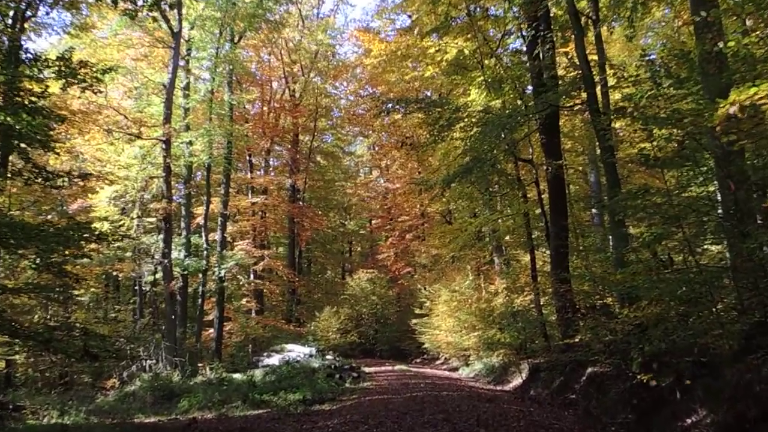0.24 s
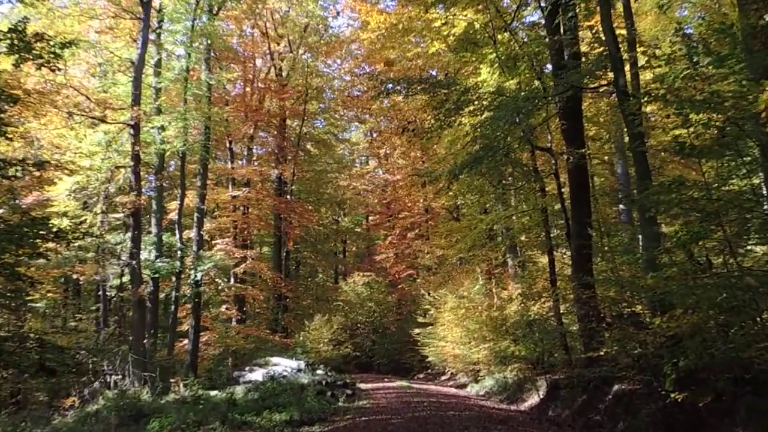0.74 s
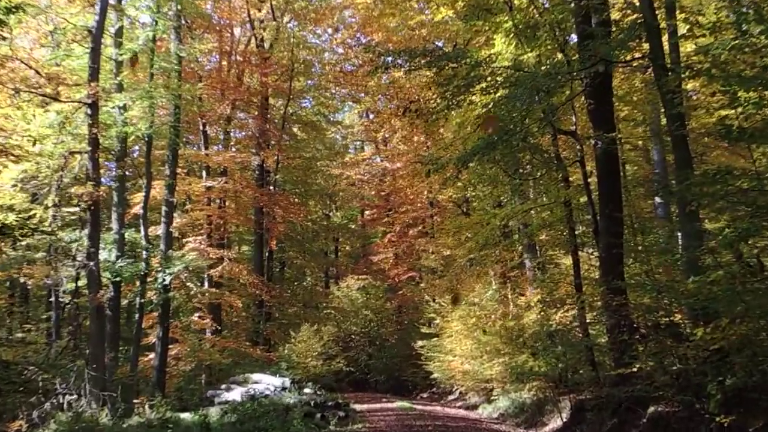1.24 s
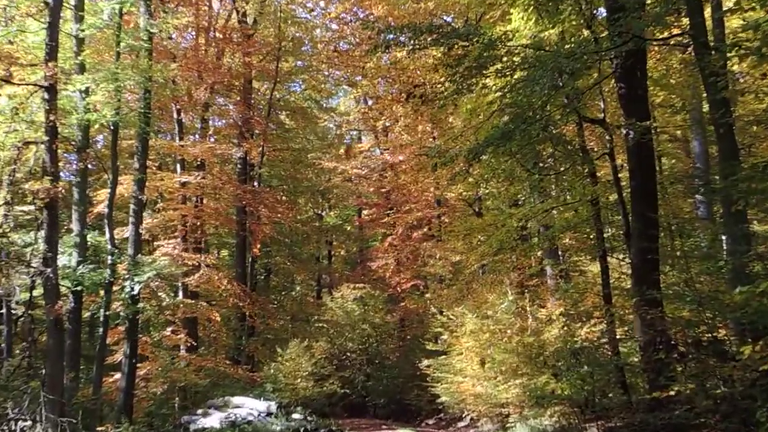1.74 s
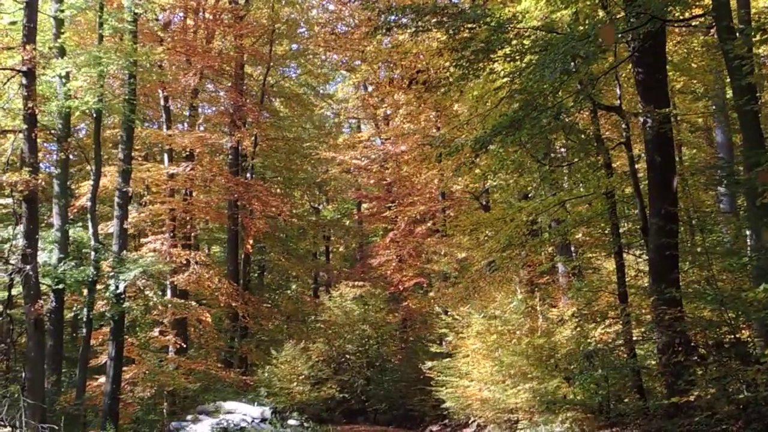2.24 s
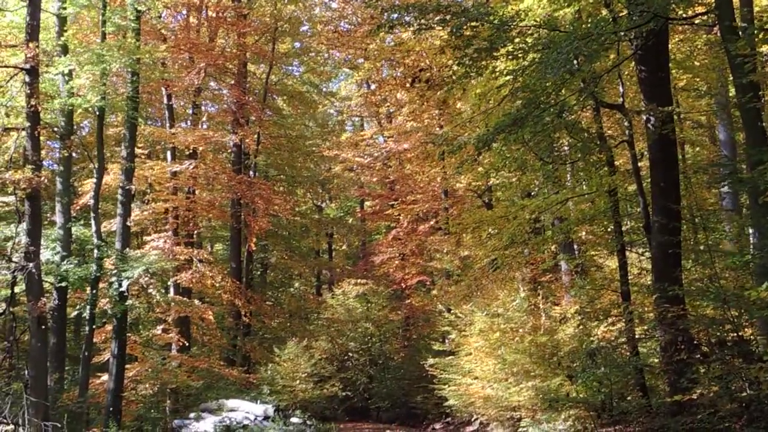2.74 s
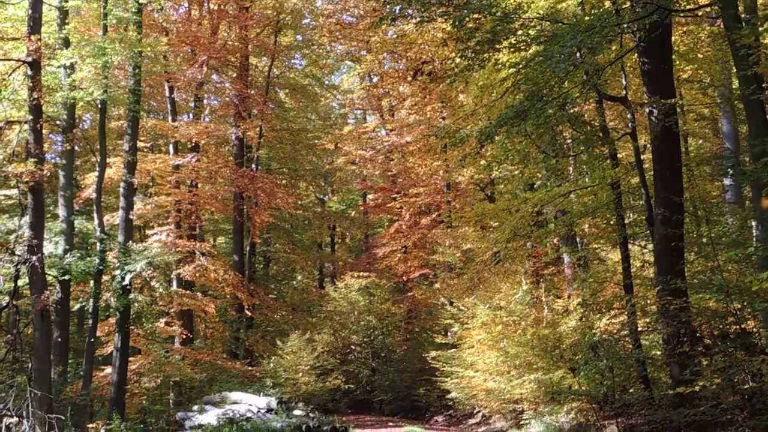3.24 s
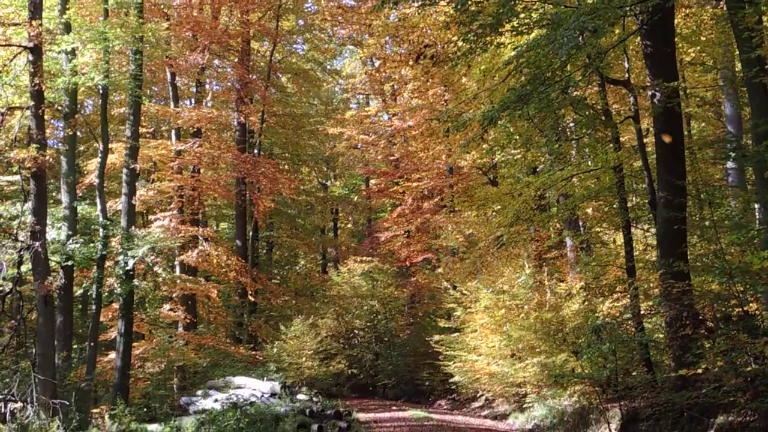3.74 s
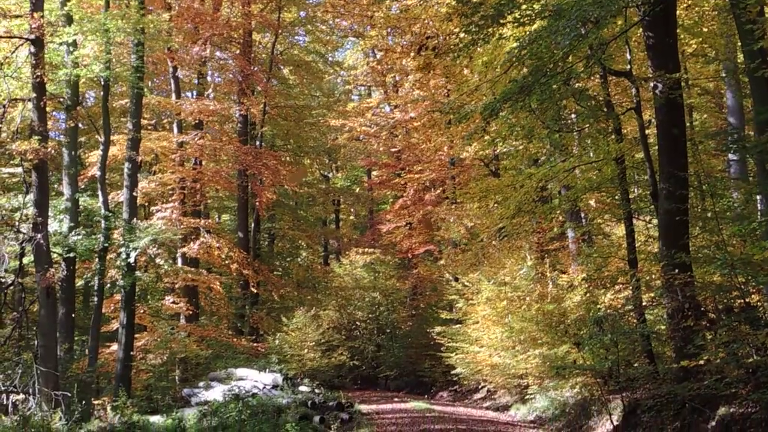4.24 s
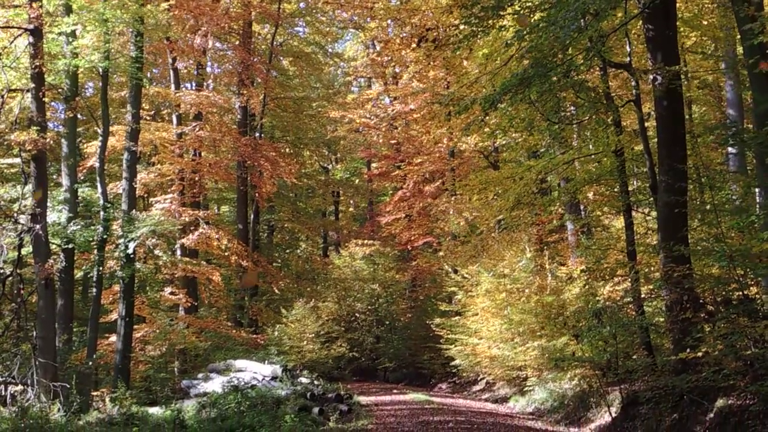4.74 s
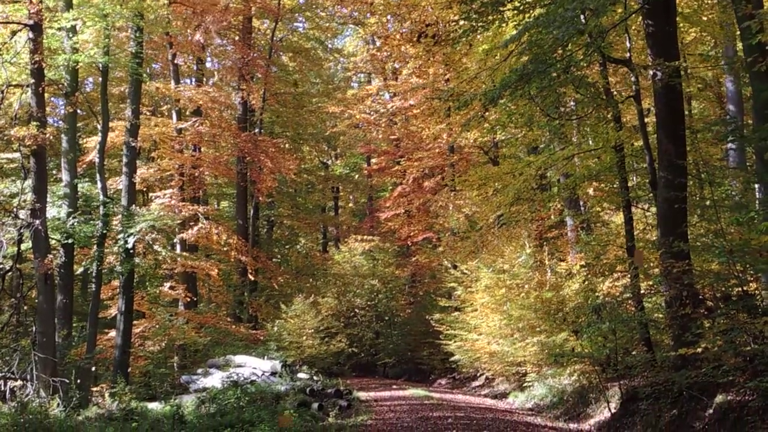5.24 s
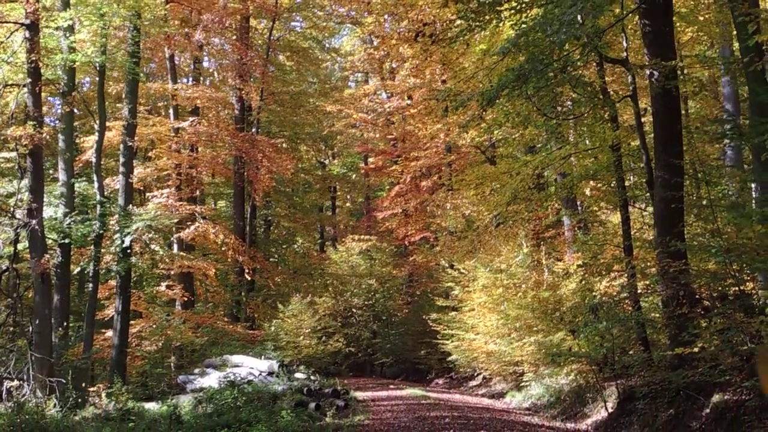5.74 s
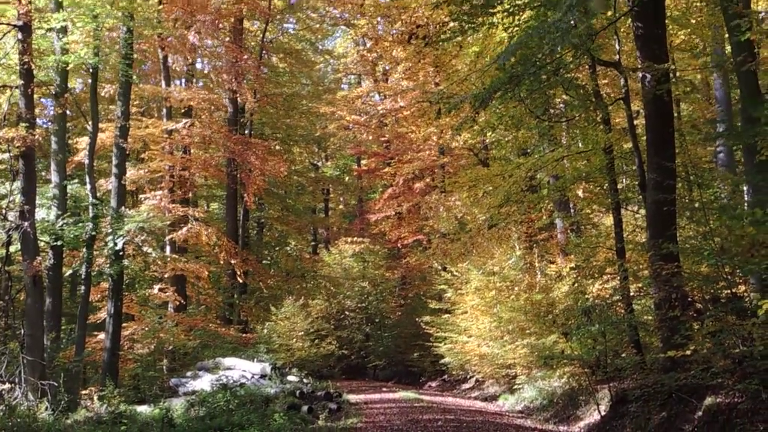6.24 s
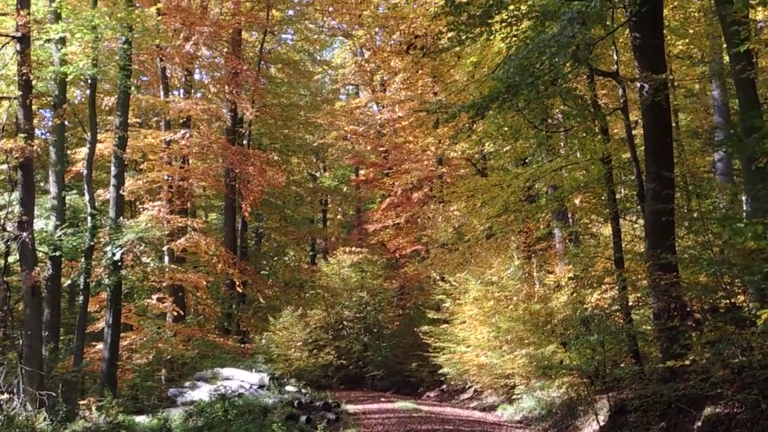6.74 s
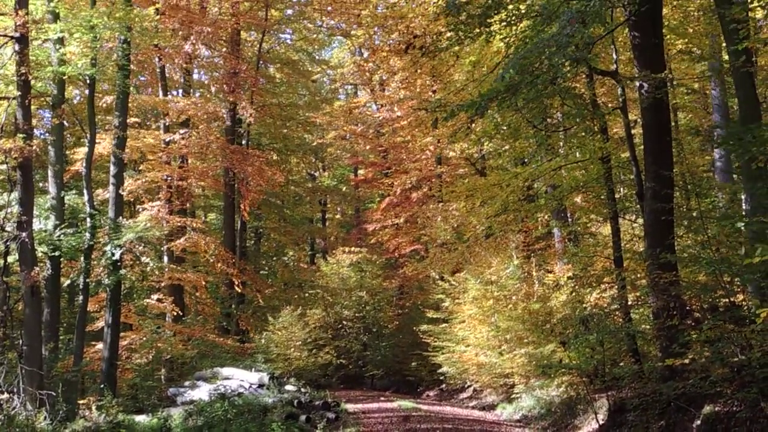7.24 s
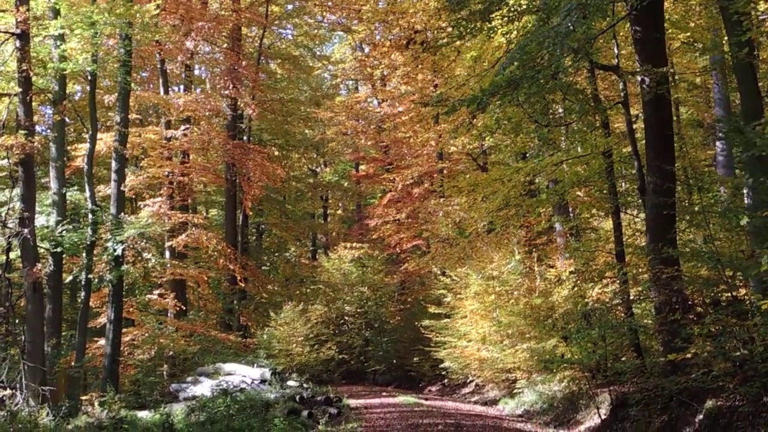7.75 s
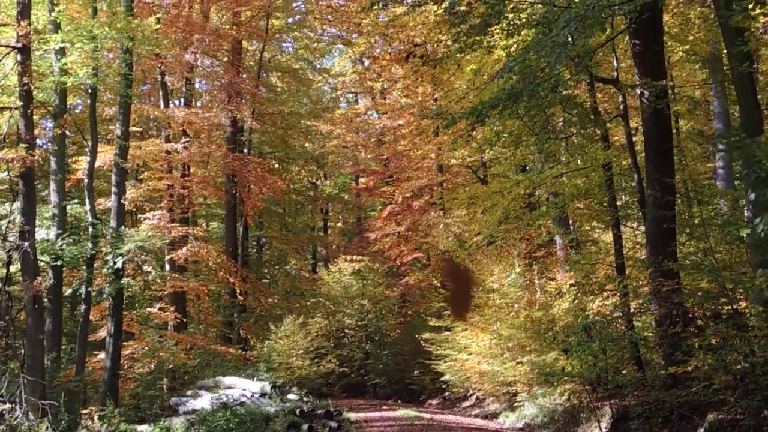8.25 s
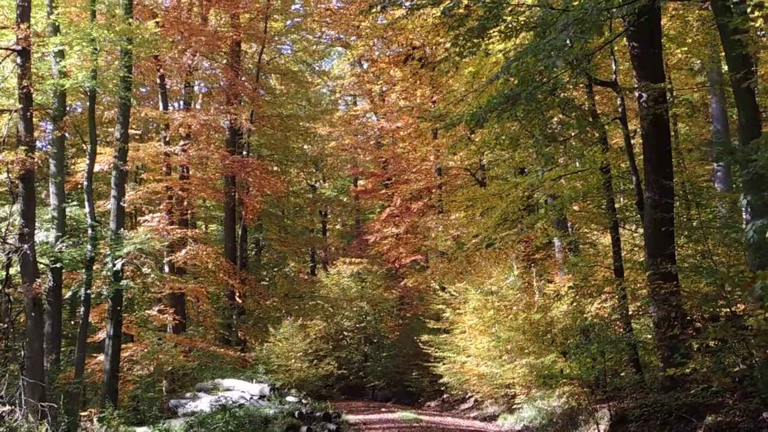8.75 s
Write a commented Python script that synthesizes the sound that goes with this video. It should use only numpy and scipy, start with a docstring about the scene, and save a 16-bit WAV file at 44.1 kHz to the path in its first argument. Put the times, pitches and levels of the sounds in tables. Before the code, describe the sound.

Dry leaves and acorns patter onto forest litter like crisp rain, with sharp close ticks, small thuds and a soft breezy leaf hiss.

```python
"""Autumn leaf and acorn fall

Dry leaves and acorns drop onto leaf litter: near ticks snap and leave a rustle, acorns thud, one hits hard wood.
Each contact is a blow plus a noise burst through a resonance, reaching two close microphone ports apart in time.
Random smaller falls patter around; shaped noise gives the low breeze and the hiss of far leaves.
"""
import sys
import numpy as np
from scipy import signal
from scipy.fft import rfft, irfft, next_fast_len
from scipy.io import wavfile
from scipy.ndimage import uniform_filter1d, map_coordinates

SR = 44100
rng = np.random.default_rng(int(sys.argv[2]) if len(sys.argv) > 2 else 0)


def file_out(sig):
    """Save sig as 16-bit WAV at sys.argv[1]."""
    # one column per channel
    cols = np.atleast_2d(sig).T
    # limit, then scale
    lim = np.clip(cols, -1, 1)
    pcm = np.round(lim * 32767).astype(np.int16)
    wavfile.write(sys.argv[1], SR, pcm)


N = 396013

# clear near contacts of dry leaves and acorns: [t/s, level/dB (rms, mean of ports), f/Hz, left port's lead/10
# us, rustle after/dB (relative), woody knock/dB (rms)]
NEAR_TICKS = [(0.089, -26.0, 9070.0, -1.0, -29.5, -33), (0.1316, -24.0, 8500.0, -3.0, -40.0, -36.0),
              (0.1598, -23, 5500.0, 3, -29.5, -28), (0.3435, -29, 2100, 0, -46, -38),
              (0.3475, -26, 2700, 0, -40.0, -38), (0.4158, -19.0, 8600.0, -6, -35, -32.0),
              (0.429, -13, 9290.0, 4, -41.0, -26), (0.496, -28.0, 8860.0, -4, -36, -39.0),
              (0.514, -25, 8500.0, 4, -40.0, -40.0), (0.587, -20, 8800.0, 3.0, -29.0, -33),
              (0.803, -20.5, 8160.0, 1.5, -39.0, -36.0), (1.1025, -30, 4000, 2, -42, -33),
              (1.113, -26, 4400.0, 5, -29, -28), (1.117, -26, 4700, 4, -40, -38),
              (1.1222, -25, 5500, 5, -40.0, -30), (1.1329, -21.0, 7500.0, 4, -40.0, -30.0),
              (1.3055, -25, 4900, 3, -39, -40), (1.308, -22, 5400.0, 4, -35, -38),
              (1.3768, -27.0, 9110.0, 3.0, -35, -40.0), (1.5438, -21, 8860.0, 2, -46.0, -32.0),
              (1.6333, -20.0, 8970.0, 6, -35, -33), (1.682, -27, 4870.0, -1.0, -31, -31),
              (1.7224, -26, 8500.0, -4, -40.0, -40.0), (1.791, -27, 3380.0, -1.0, -26.5, -30),
              (1.8149, -24, 8500.0, 5, -40.0, -27), (2.0417, -9.5, 8050.0, 3, -25, -21.5),
              (2.1, -30, 2390.0, -4, -32, -41), (2.291, -19.0, 9190.0, 3.5, -31.5, -26),
              (2.386, -16, 6100, 4, -31, -30.0), (2.4405, -27, 3460.0, -1.0, -36, -35),
              (2.5551, -23.0, 9000.0, 0.0, -29, -30.0), (2.6186, -21.0, 8050.0, 3, -29, -37),
              (2.6441, -24.0, 7520.0, 6, -25, -30.0), (2.697, -9.5, 9400, 5, -26.5, -28),
              (2.859, -13, 10300, 8, -21.5, -22), (2.886, -20, 8710.0, 7.0, -29, -32.0),
              (2.9095, -6, 9450, 4.5, -23, -23), (2.9396, -16.0, 8200.0, -4.5, -31, -32.0),
              (3.0744, -23, 4430.0, -1.0, -31, -29.5), (3.117, -25.0, 5020.0, 0.0, -46.0, -32),
              (3.1907, -29, 3000.0, 1.0, -40.0, -34.0), (3.236, -27, 3750.0, 7, -30, -33.0),
              (3.514, -23.5, 2330.0, -4, -31, -33), (3.5625, -22.0, 8500.0, 3.0, -38, -29),
              (3.7974, -23.0, 8960.0, 5.0, -33, -37.0), (4.1435, -32, 3000.0, -1, -42, -35.0),
              (4.207, -23.5, 3680.0, 4, -43.0, -29), (4.282, -27, 2390.0, 3.0, -42.0, -39),
              (4.5218, -29, 2520.0, 0.0, -36, -36.0), (4.6125, -21, 8080.0, 2, -44.0, -35),
              (4.648, -24, 8620.0, 9.0, -37, -34.0), (4.905, -33, 5580.0, 4, -31, -33.0),
              (4.9575, -7.5, 8000, 3.5, -31, -27), (4.9775, -18.0, 8590.0, 5.5, -32.0, -32.0),
              (4.99, -27, 3200.0, 0.0, -40.0, -35.0), (5.1245, -11, 8840.0, 4, -29.0, -31.0),
              (5.1494, -20, 8940.0, 3.5, -26.5, -37), (5.2787, -26.0, 9000.0, 4.0, -30, -40.0),
              (5.327, -28, 2430.0, -2, -46.0, -34.5), (5.497, -20, 9610.0, 2, -28, -33.0),
              (5.5077, -26, 8500.0, 5, -40.0, -39), (5.5251, -19.0, 8580.0, 6, -31, -30),
              (6.055, -22.0, 8680.0, 3.0, -36, -40.0), (6.768, -14.5, 9100.0, 2, -37, -30.0),
              (6.7945, -26, 8000, 2, -41, -27), (6.825, -17, 10260.0, 5, -32, -40.0),
              (6.8314, -32, 3000.0, 0.0, -40.0, -36.0), (7.0865, -30, 3000.0, 6, -38, -33),
              (7.1363, -34, 2030.0, 0.0, -30.0, -39.0), (7.1903, -18, 8630.0, -4.5, -43, -37.0),
              (7.2189, -27, 4030.0, 2.0, -42, -29), (7.2225, -28, 4500, 2, -44, -32),
              (7.286, -31, 3500, 2, -40, -33), (7.556, -16, 8700.0, 2.0, -34.0, -29.0),
              (7.604, -27, 4200.0, 4, -25.5, -29), (7.611, -22, 8200, 2, -40, -38),
              (7.6178, -24, 8500.0, -4, -40.0, -39.0), (7.6308, -18, 7810.0, 3, -31, -40),
              (7.7083, -29, 2650.0, -6, -34, -39.0), (8.1253, -29, 8500.0, 3, -48, -43),
              (8.2247, -29, 4000.0, 4, -31, -36.0), (8.244, -22, 7930.0, 2.0, -37, -33.0),
              (8.3065, -9.5, 9000, -3.5, -31, -37.0), (8.321, -23.0, 8600.0, -1.0, -43.0, -33),
              (8.365, -31, 2550.0, -1.0, -46.0, -42), (8.4502, -19, 7650, 1, -37, -36.0),
              (8.4737, -26.0, 8500.0, 5, -35, -40.0), (8.91, -17, 7700.0, -2.5, -47, -39)]
SHADE_DB_PER_10US = 0.8  # level difference between the ports for each 10 us of lead


def amp(db):
    """Amplitude of a level in dB."""
    return 10 ** (np.asarray(db) / 20)


def unit(x):
    """x scaled to rms 1."""
    return x / np.sqrt(np.mean(x ** 2) + 1e-20)


def along(points, hz):
    """Value at hz from (f/Hz, value) points, interpolated on a log frequency axis."""
    f_hz, value = np.transpose(points)
    return np.interp(np.log(hz + 1), np.log(f_hz + 1), value)


def filtered(x, response):
    """x filtered by a response given as a function of frequency."""
    size = next_fast_len(N + 8192)
    spectrum = rfft(x, size) * response(np.fft.rfftfreq(size, 1 / SR))
    return irfft(spectrum, size)[..., :N]


def wobble(knots_per_s):
    """Smooth random curve: a spline through normal random knots."""
    knots = rng.standard_normal(int(N * knots_per_s / SR) + 4)
    return map_coordinates(knots, [np.arange(N) * knots_per_s / SR])


def rush(spectrum, patchy_db):
    """Diffuse noise with time-frequency patches of random gain; its mid has rms 1 before the port lean."""
    # sound from all around, port difference against port sum: [f/Hz, level/dB]
    apart = [(60, -20), (110, -19), (200, -19), (370, -19.5), (690, -17.5), (1270, -15.5), (2330, -15),
             (4290, -4.5), (7900, -1), (14500, 5.5)]
    # sensitivity of the left port over the right: [f/Hz, level/dB]
    lean = [(60, -.5), (3400, -0.5), (4800, 1), (6500, 0), (8900, 3.5), (11400, 0.5), (14500, 1.4)]
    z = signal.stft(rng.standard_normal((2, N)), nperseg=512)[2]
    field = rng.standard_normal(z.shape[1:])
    field = uniform_filter1d(field, size=10, axis=0)  # across frequency
    field = uniform_filter1d(field, size=8, axis=1)  # across time
    pair = signal.istft(z * amp(patchy_db * unit(field)), nperseg=512)[1][:, :N]

    def mid_side_gain(hz):
        return amp(along(spectrum, hz) + [0 * hz, along(apart, hz)])

    def port_gain(hz):
        return amp(np.outer([0.5, -0.5], along(lean, hz)))

    mid, side = filtered(pair, mid_side_gain)
    return filtered(np.array([mid + side, mid - side]), port_gain) / np.std(mid)


def contacts(s, db, hz, ms, lag_us, pan_db, sharp, broad_db, solid, size=1024):
    """Each contact: a one-sample blow (solid = its energy share) and a noise burst through a resonance."""
    t, f = np.arange(size) / SR, np.fft.rfftfreq(size, 1 / SR)
    age = t / (ms[:, None] / 1000)
    burst = age ** 0.3 * np.exp(-1.6 * age ** 0.65) * rng.standard_normal((len(s), size))
    blow = np.sqrt(solid) * np.sign(burst[:, 1]) * np.linalg.norm(burst, axis=1)
    burst = np.sqrt(1 - solid) * burst
    burst[:, 0] = blow

    centre, sharp = hz[:, None], np.reshape(sharp, (-1, 1))
    damping = 1j * f * centre / sharp
    ring = damping / (centre * centre - f * f + damping)
    port = 1 / (1 + 1j * f / 9200 * 0.46 - (f / 9200) ** 2)  # port cavity rings, then dulls the top
    z = rfft(burst) * (ring ** 2 + amp(broad_db)) * port ** 2

    # level db = rms if the energy filled exactly ms
    energy = np.sum(irfft(z) ** 2, axis=1)
    z *= (amp(db) * np.sqrt(ms / 1000 * SR / energy))[:, None]
    where = (np.round(s * SR).astype(int)[:, None] + np.arange(size)).ravel()
    ports = []
    for side in (0.5, -0.5):  # left, right
        delay_s = side * lag_us[:, None] / 1e6 + 2 / SR  # 2 samples keep early arrivals positive
        wave = irfft(z * np.exp(-2j * np.pi * f * delay_s)) * amp(side * pan_db)[:, None]
        ports.append(np.bincount(where, wave.ravel(), N + size)[:N])
    return np.array(ports)


def far_woods():
    """One wind curve drives the low breeze in the crowns and the merged hiss of far leaves."""
    # wind in the crowns: [t/s, leaf hiss level/dB]
    wind = [(0.0, -33.5), (0.35, -33), (1.75, -33.5), (2.1, -33.5), (2.55, -30.5), (3.43, -31), (3.62, -32),
            (3.83, -32), (4.05, -31), (4.75, -31.5), (5.75, -31.5), (7.48, -31.5), (8.03, -33), (8.2, -35),
            (8.98, -34.5)]
    # low breeze spectrum: [f/Hz, relative level per Hz/dB]
    breeze_spectrum = [(18, -38), (30, -8.5), (69, -2), (325, -1), (1080, -5), (1800, -7.5), (2340, -18),
                       (3960, -120)]
    # leaf hiss spectrum: [f/Hz, relative level per Hz/dB]
    hiss_spectrum = [(530, -14), (900, -9.5), (1700, -2.5), (2600, 1), (3400, 1.5), (4300, 0.5),
                     (6300, 0.5), (8000, 2), (8900, 2), (10600, -5.5), (12000, -12), (14100, -21.5),
                     (14600, -63), (15000, -68)]
    breeze_re_hiss_db, breeze_swing = -9.5, 1  # swing: share of the hiss's level swings
    wind_db = np.interp(np.arange(N) / SR, *np.transpose(wind))
    mean_db = wind_db.mean()
    breeze_db = mean_db + breeze_re_hiss_db + breeze_swing * (wind_db - mean_db)
    flurry = wobble(12)
    breeze = amp(breeze_db + 0.16 * flurry) * rush(breeze_spectrum, patchy_db=1.0)
    hiss_db = wind_db + 0.38 * flurry + 0.54 * wobble(45)
    hiss = amp(hiss_db) * rush(hiss_spectrum, patchy_db=0.97)
    return breeze + hiss


def patter(count, level_db, spread_db, centre_hz, cap_db):
    """Smaller falls at random moments, levels, pitches and port lags; low contacts last longer."""
    u, g = rng.random((count, 3)), rng.standard_normal((count, 3))
    s = u[:, 0] * (N - 1) / SR
    hz = np.clip(centre_hz * np.exp(0.55 * g[:, 0]), 300, 11000)
    boost_db = np.minimum(-spread_db * np.log(u[:, 1]), cap_db)
    db = level_db + boost_db + 1.9 * np.log2(hz / centre_hz)
    ms = np.minimum(0.95 * np.exp(0.45 * g[:, 1]) * (5500 / hz) ** 0.86, 5)
    lag_us = 62 * np.sin(2 * np.pi * u[:, 2])
    pan_db = 0.72 + 2.0 * g[:, 2]
    return contacts(s, db, hz, ms, lag_us, pan_db, sharp=1.66, broad_db=-36, solid=0.46, size=512)


def snaps():
    """Brittle leaf blades break: thin bright clicks with the port lead of the tick nearest in time."""
    # breaking leaves: [t/s, level/dB (rms, mean of ports)]
    breaks = [(0.0877, -29), (0.415, -32), (0.4279, -31), (0.8016, -30), (1.3064, -32), (1.5429, -30),
              (2.0408, -22), (2.385, -34), (2.6968, -25), (2.9088, -14), (3.7963, -28), (4.9566, -26),
              (5.1213, -30), (5.2011, -29), (5.4976, -23), (6.7675, -25), (6.7935, -27), (6.8239, -19),
              (7.5547, -25), (7.6021, -32), (8.1244, -35), (8.306, -17), (8.3204, -29), (8.4492, -37),
              (8.9092, -30)]
    snap_hz, snap_ms = 13100, 1
    s, db = np.transpose(breaks)
    tick_s, tick_lead = np.transpose(NEAR_TICKS)[[0, 3]]
    lead = tick_lead[np.argmin(np.abs(s[:, None] - tick_s), axis=1)]
    return contacts(s, db, snap_hz + 0 * s, snap_ms + 0 * s, -10 * lead, SHADE_DB_PER_10US * lead,
                    sharp=3.5, broad_db=-40, solid=0.15)


def ticks():
    """Near contacts of leaves and acorns with a woody knock beneath, each followed by a decaying crackle of
    litter."""
    # disturbed litter spectrum: [f/Hz, relative level per Hz/dB]
    crackle = [(500, -9), (1500, -2.5), (4000, -2.5), (8700, 3), (10600, -0.5), (12000, -8), (14100, -17),
               (15000, -66)]
    tick_ms, ref_hz, shortening_power = 1.3, 6000, 0.87  # length at ref_hz; higher contacts are shorter
    knock_hz, port_travel_us = 2860, 76  # travel: longest lag between the ports
    s, db, hz, lead, rustle_db, knock_db = np.transpose(NEAR_TICKS)
    ms = tick_ms * (ref_hz / hz) ** shortening_power
    lag_us = np.clip(-10 * lead, -port_travel_us, port_travel_us)
    pan_db = SHADE_DB_PER_10US * lead

    starts = np.bincount(np.round(s * SR).astype(int), amp(2 * rustle_db), N)  # power
    t = np.arange(SR // 2) / SR
    settling = amp(-2 * 60 * t / 0.25) * (1 - np.exp(-t / 0.001))  # power falls 60 dB in 0.25 s
    power = np.abs(signal.fftconvolve(starts, settling)[:N])
    rustle = np.sqrt(power) * amp(3.5 * wobble(320)) * rush(crackle, patchy_db=2.0)

    tick = contacts(s, db, hz, ms, lag_us, pan_db, sharp=1.77, broad_db=-33.0, solid=0.15)
    knock = contacts(s, knock_db, np.full(len(s), knock_hz), 2.2 * ms, lag_us, 0 * s,
                     sharp=0.97, broad_db=-40, solid=0.55)
    return tick + knock + amp(-3.0) * rustle


def thuds():
    """Acorns strike and ring briefly; soil answers lower; long waves reach both ports alike."""
    # acorns on soil or wood: [t/s, level/dB (rms), f/Hz, ring sharpness (Q), soil's answer/dB (rms)]
    acorns = [(0.1595, -32, 1900, 2.2, -41), (0.2028, -26, 1720, 4, -48), (0.4277, -38, 1100, 1.5, -41),
              (0.8728, -24, 1400, 3.8, -30.5), (0.88, -36, 420, 1.6, -45), (0.893, -36, 1200, 1.5, -37),
              (1.049, -29, 1700, 1.4, -39), (1.1124, -33, 1100, 1.5, -46), (1.7465, -35, 1400, 2, -37),
              (2.242, -32, 1600, 3, -45), (2.5725, -29, 1600, 3, -48), (2.642, -39, 660, 1.5, -50),
              (2.6955, -30, 1400, 1.5, -52), (2.911, -28, 1130, 1.5, -41), (3.0765, -38, 448, 2, -42),
              (3.2235, -35, 1600, 2.5, -48), (4.2415, -29, 1550, 3, -36), (4.932, -42, 480, 2, -44),
              (5.5015, -30, 1500, 1.9, -37), (5.525, -30.5, 1000, 1.3, -41), (5.913, -35, 215, 1.3, -51),
              (6.1855, -28, 1460, 4, -43), (6.493, -39, 224, 1.5, -50), (6.7935, -35, 1000, 2, -51),
              (7.5554, -30, 1050, 2, -44), (7.6025, -31, 1100, 1, -34), (8.223, -34, 1000, 1.3, -36),
              (8.462, -29.5, 1500, 4.5, -51), (8.95, -38, 1000, 2, -48)]
    thud_cycles, soil_ms = 3.1, 7.6  # thud length in its own cycles
    s, db, hz, sharp, soil_db = np.transpose(acorns)
    knock = contacts(s, db, hz, thud_cycles * 1000 / hz, 0 * s, 0 * s, sharp,
                     broad_db=-30, solid=0.87, size=2048)
    soil = contacts(s, soil_db, 0.45 * hz, soil_ms + 0 * s, 0 * s, 0 * s, sharp=0.64,
                    broad_db=-45, solid=0.35, size=2048)
    return knock + soil


def hard_hit():
    """The nearest acorn hits hard wood and sets all its resonances ringing at once."""
    # ring of the struck wood: [f/Hz, level/dB (rms), sharpness (Q), length/ms]
    modes = [(560, -20, 1.3, 1.5), (1200, -22, 2, 1.9), (2570, -12.5, 2.2, 1.1), (3670, -13, 3.5, 1.2),
             (5300, -13, 3.1, 1.4), (6800, -8.5, 14, 1.5), (8670, -4.5, 6.8, 2)]
    hit_s, lead_10us = 2.859, 4.4  # left port leads
    hz, db, sharp, ms = np.transpose(modes)
    return contacts(hit_s + 0 * hz, db, hz, ms, -10 * lead_10us + 0 * hz, 0 * hz, sharp,
                    broad_db=-31, solid=0.32, size=2048)


def scene():
    """Far woods, scattered patter and near falls."""
    woods = far_woods()
    leaves = patter(count=1500, level_db=-39.0, spread_db=4.0, centre_hz=5360, cap_db=7.5)
    acorns = patter(count=110, level_db=-47.5, spread_db=6.0, centre_hz=800, cap_db=4.0)
    return woods + leaves + acorns + snaps() + ticks() + thuds() + hard_hit()


def record(dry):
    """Peaks are rounded off near full scale; a low-pass leaves nothing above the band limit."""
    top_hz, slope_hz = 15300, 400
    limited = dry / (1 + np.abs(dry) ** 12) ** (1 / 12)

    def edge(hz):
        return np.clip((top_hz - hz) / slope_hz, 0, 1) ** 2

    return np.clip(filtered(limited, edge), -1, 1)


dry = scene()
out = record(dry)
file_out(out)
```